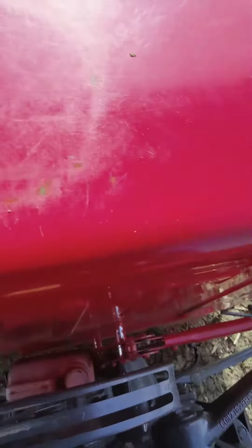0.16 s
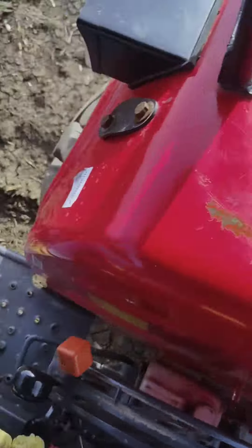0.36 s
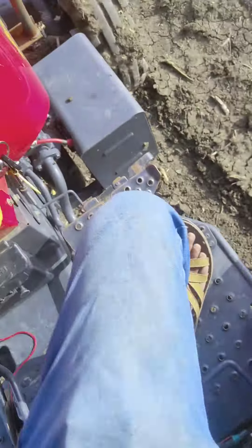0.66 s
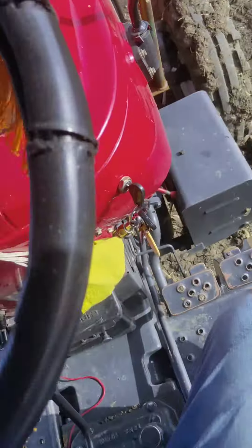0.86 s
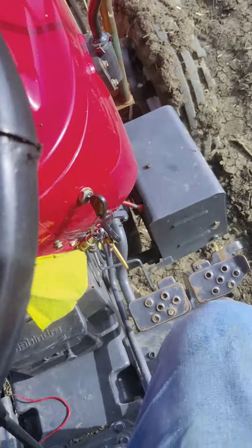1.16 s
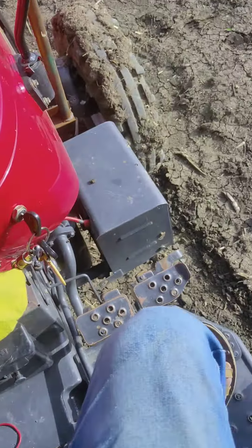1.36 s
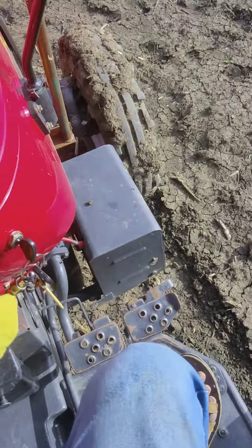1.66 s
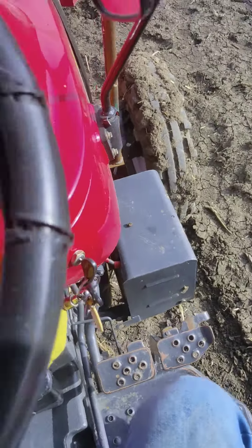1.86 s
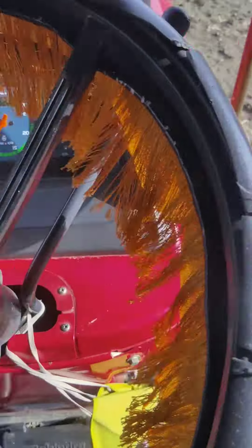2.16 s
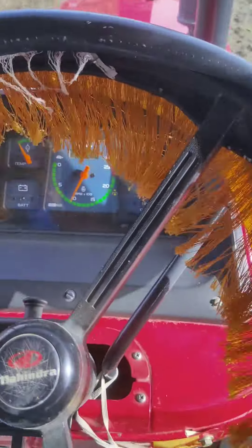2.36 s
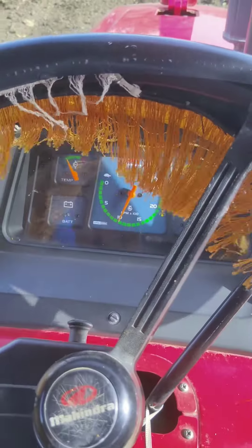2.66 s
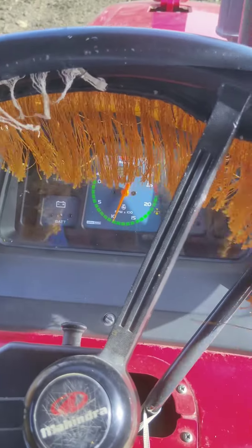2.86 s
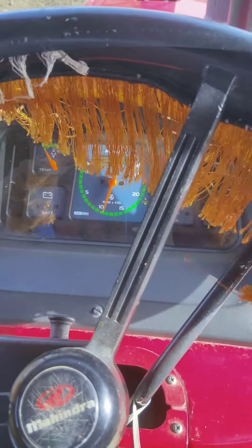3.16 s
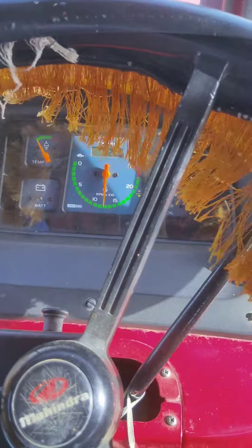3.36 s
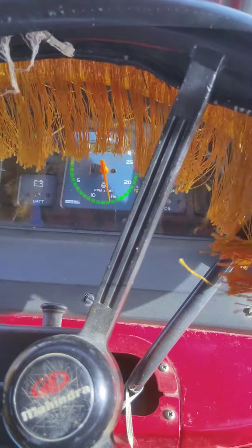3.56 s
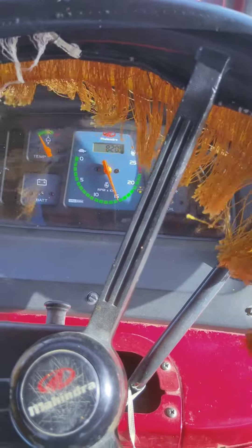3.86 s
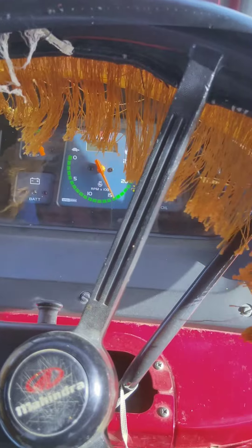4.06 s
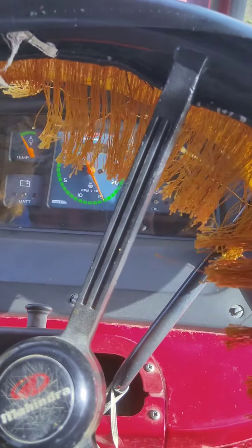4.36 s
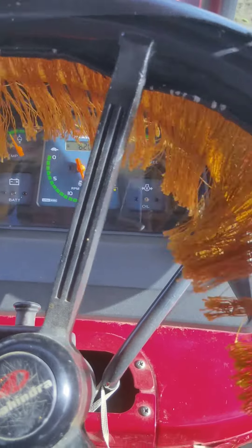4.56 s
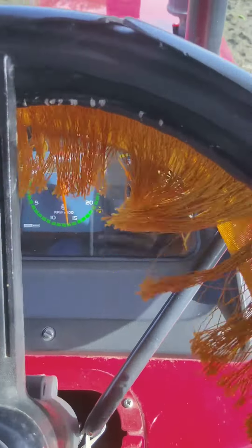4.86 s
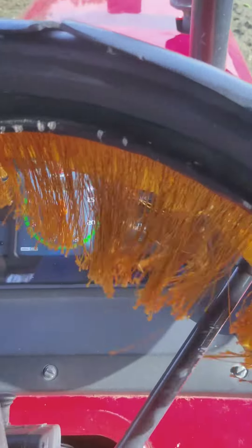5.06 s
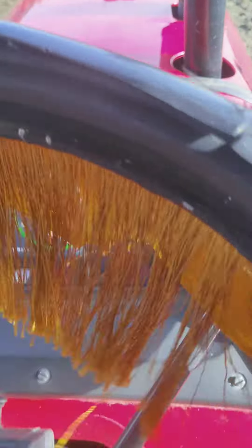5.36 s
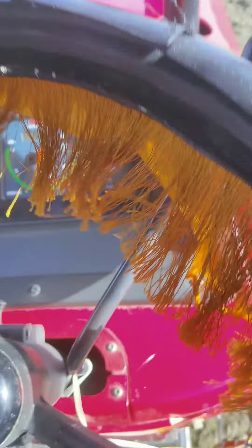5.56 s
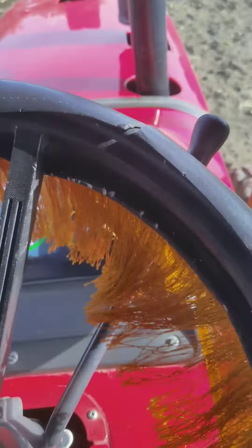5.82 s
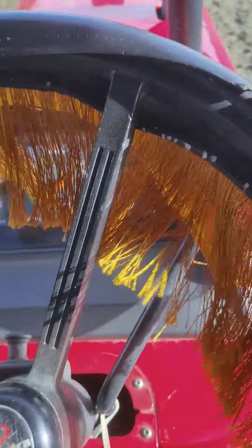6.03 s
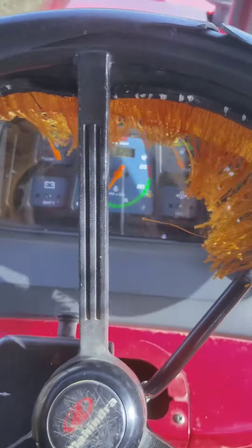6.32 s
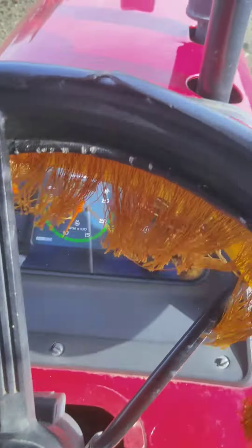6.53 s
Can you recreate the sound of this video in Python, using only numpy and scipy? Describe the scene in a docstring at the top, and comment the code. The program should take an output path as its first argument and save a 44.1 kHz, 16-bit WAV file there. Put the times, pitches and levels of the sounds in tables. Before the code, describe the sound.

A small diesel tractor idles, revs up in steps to a hard roar, coasts down, then labours loudly under load with a few metallic clicks.

```python
"""A field, heard from the driver's seat of a three-cylinder diesel tractor dragging a cultivator.
It idles, revs up, coasts down, then labours under load. Every firing gives an exhaust puff built
from low multiples of the firing rate, and bursts of coloured noise for rumble, thud, knock and clatter.
The block and cylinder walls ring as resonators, gears whine at higher engine orders, gear teeth rattle
when the throttle shuts, and there are a few sharp metallic clicks, some of them harder knocks on a firing."""
import sys
import numpy as np
from scipy import signal
from scipy.fft import rfft, irfft
from scipy.io import wavfile

SR = 44100
rng = np.random.default_rng(int(sys.argv[2]) if len(sys.argv) > 2 else 0)


def waveform_to_disk(signal):
    """Save audio, clipped to [-1, 1], as 16-bit WAV at the path in sys.argv[1]."""
    frames = np.transpose(np.atleast_2d(signal))
    scaled = np.clip(frames, -1, 1) * 32767
    samples = np.round(scaled).astype(np.int16)
    wavfile.write(sys.argv[1], SR, samples)


N = 295029

# colour of heavy blows on the block: (frequency [Hz], level per Hz [dB])
THUD_COLOUR = [(280, -11), (450, -1), (530, -1.5), (615, 0.5), (690, -3.5), (790, -5), (900, -6),
               (1000, -11), (1200, -19.5), (1500, -29), (2600, -57)]
# colour of bright metallic clatter: (frequency [Hz], level per Hz [dB])
CLATTER_COLOUR = [(2400, -24.5), (3500, -14), (4500, -8.5), (4950, -6.5), (5400, -5.5), (5900, -1),
                  (6450, 2.5), (7000, -2), (7550, -4), (8000, -26.5), (9000, -47)]


def from_db(db):
    """Decibels to gain."""
    return 10 ** (np.asarray(db) / 20)


def rms_one(x):
    """Scale to rms 1."""
    return x / np.sqrt(np.mean(x ** 2) + 1e-20)


def in_time(rows):
    """Read a (time, value) curve at every sample."""
    times, values = np.transpose(rows)
    return np.interp(np.arange(N) / SR, times, values)


def at_hz(points, hz):
    """Read a table over log frequency at the given frequencies."""
    table_hz, value = np.transpose(points)
    return np.interp(np.log(hz), np.log(table_hz), value)


def at_bins(points):
    """Read a table over log frequency at every FFT bin."""
    return at_hz(points, np.arange(N // 2 + 1) * SR / N + 1)  # 1 Hz up, to avoid log(0)


def drift(rate):
    """Smooth chance with so many turns a second; spread 1."""
    position = np.arange(N) * rate / SR
    return rms_one(np.interp(position, np.arange(N), rng.standard_normal(N)))


def radiate(pair, colour):
    """Two unrelated vibrations take a part's colour and reach both ports, most alike in the bass; rms 1."""
    # likeness of the two microphone ports: (frequency [Hz], correlation [-1 to 1])
    likeness = [(60, 1), (120, 0.73), (240, 0.91), (490, 0.6), (750, 0.16), (1100, 0.4), (2500, 0.22),
                (7000, 0.17)]
    # above the bass the engine is heard directly, later at the left port: (frequency [Hz], lag [s])
    port_lag = [(700, 0), (1050, .00043)]
    mid, side = rfft(pair) * from_db(at_bins(colour))
    alike = np.clip(at_bins(likeness), -.99, .99)
    shared = np.sqrt(1 + alike) * mid
    apart = np.sqrt(1 - alike) * side
    bin_hz = np.arange(len(mid)) * SR / N
    late = np.exp(-2j * np.pi * bin_hz * at_bins(port_lag))
    return rms_one(irfft(np.array([(shared + apart) * late, shared - apart]), N))


def shaking(firings, repeat, size=2400):
    """Dense contacts: one share recurs at the same crank angles every three firings, the rest is new."""
    contact = (firings / 3 % 1 * size).astype(int) % size
    density = np.minimum(np.gradient(firings) * size / 3, 1)  # contacts per sample: evens the power per Hz
    locked = rng.standard_normal((2, size))[:, contact] * np.sqrt(density)
    return np.sqrt(repeat) * locked + np.sqrt(1 - repeat) * rng.standard_normal((2, N))


def bursts(firings, depth, cylinder_db, scatter_db, grain_db, grain_rate):
    """Each firing swells fast and dies away; cylinders and firings differ in strength; mean power about 1."""
    # one burst: (share of the firing interval since injection [0-1], relative level at depth 1 [dB])
    burst = [(0, -13), (.07, -18), (.16, -1), (.35, 1), (.6, -10.5), (.9, -12), (1, -16)]
    number = np.floor(firings).astype(int) + 1  # the first firing is already under way
    shape = from_db(depth * np.interp(firings % 1, *np.transpose(burst)))
    power = np.bincount(number, shape ** 2) / np.bincount(number).clip(1)
    even_shape = shape / np.sqrt(power[number])
    strength_db = np.array(cylinder_db)[number % 3] + scatter_db * rng.standard_normal(N)[number]
    return even_shape * rms_one(from_db(strength_db + grain_db * drift(grain_rate)))


def line(firings, order, waver_db, wander, port_turn):
    """One engine order wavers in level and timing, slightly out of step at the ports; rms about 1."""
    turn = 2 * np.pi * order * firings + wander * drift(15)  # wander and port_turn in radians
    turn = turn + port_turn * np.array([[-1], [1]])
    return np.sqrt(2) * np.cos(turn) * from_db(waver_db * drift(16))


def resonate(x, hz, width_hz):
    """A mode that keeps ringing after it is shaken; gain about 1 at its centre."""
    r = np.exp(-np.pi * width_hz / SR)
    feed = np.array([1, 0, -1]) * (1 - r * r) / 2
    return signal.lfilter(feed, [1, -2 * r * np.cos(2 * np.pi * hz / SR), r * r], x)


def exhaust(firings, rate, fuel, phase_step):
    """Fuel shapes the puffs; the silencer leaves low multiples that boom as they cross the pipe resonance."""
    # puff before the pipe: (multiple of the firing rate, idling [dB], cruising [dB],
    # speeding up [dB], labouring [dB])
    puff = [(1, -27, -9.5, -7.5, -15.5), (2, -33, -15, -13, -8), (3, -34, -18.5, -20, -14),
            (4, -32.5, -23.5, -18, -31.5), (5, -30.5, -29.5, -29.5, -15)]
    # share of the full charge in those four states: (idling, cruising, speeding up, labouring) [0-1]
    puff_fuel = (.15, .35, .75, 1)
    # exhaust pipe and silencer: (frequency [Hz], gain [dB])
    pipe = [(20, -53), (55, -31.5), (80, -13), (100, -5), (112, 0.5), (128, -2), (145, -4.5), (165, -4.5),
            (200, -8), (280, -17)]
    out = 0
    for multiple, *puff_db in puff:
        k = round(multiple)
        db = np.interp(fuel, puff_fuel, puff_db) + at_hz(pipe, k * rate)
        tone = line(firings + phase_step / k, order=k, waver_db=1.16, wander=0.029, port_turn=0.14)
        out = out + from_db(db) * tone
    return out


def chassis_rumble(firings, load):
    """The firings shake the chassis: low noise, part of it repeating with the crank, gently pulsed."""
    # (frequency [Hz], level per Hz [dB])
    colour = [(30, -47.5), (70, -17), (100, -5.5), (125, -1.5), (165, 0), (205, -2.5), (245, -0.6),
              (288, -3.5), (370, -5.5), (430, -11), (520, -20), (900, -58.5)]
    pulse = bursts(firings, 0.11 * load, [0, .3, -.3], scatter_db=0.38, grain_db=0.77, grain_rate=48)
    return radiate(shaking(firings, repeat=0.51), colour) * pulse


def block_thud(firings, load):
    """Each firing thumps the block: low-mid noise in uneven pulses."""
    pulse = bursts(firings, .5 * load, [-.7, 1.1, -.4], scatter_db=1.5, grain_db=0.0, grain_rate=270)
    return radiate(shaking(firings, repeat=0.49), THUD_COLOUR) * pulse


def block_ring(firings, load):
    """Each firing shakes the block and bonnet, whose modes ring on between firings; rms 1."""
    # block and bonnet modes: (frequency [Hz], width [Hz], relative level [dB])
    modes = [(340, 82, 5), (551, 64, -4.5), (612.4, 23.7, 4.5), (801, 55, -7), (845.5, 25, 0),
             (1080, 180, -15)]
    blows = radiate(shaking(firings, repeat=0.29), [(150, -28.5), (300, 5.5), (1100, 3.5), (1500, -19)])
    blows *= bursts(firings, 0.24 * load, [-.7, 1.1, -.4], scatter_db=1.6, grain_db=3.2, grain_rate=360)
    ring = 0
    for k, (hz, width_hz, db) in enumerate(modes):
        ring = ring + (-1) ** k * from_db(db) * resonate(blows, hz, width_hz)  # alternating polarity
    return rms_one(ring)


def ignition(firings, fall, scale_db):
    """The fuel ignites with a crack that dies within a small share of the firing interval."""
    age = firings % 1 / fall
    return from_db(scale_db) * np.exp(-age) * (1 - np.exp(-2 * age))


def combustion_knock(firings, force):
    """Combustion pressure knocks on the metal: mid-to-high noise driven by the combustion force."""
    # (frequency [Hz], level per Hz [dB])
    colour = [(700, -17.5), (1100, 5), (1400, -5.5), (1560, -2), (1850, -10), (2150, -7), (2650, -8),
              (3300, -10.5), (4500, -15), (7000, -46.5)]
    return radiate(shaking(firings, repeat=0.44), colour) * force


def wall_ring(firings, force, hz, width_hz):
    """Combustion makes the cylinder walls ring: the metallic note of the knock; rms 1."""
    blows = shaking(firings, repeat=0.63) * force
    return rms_one(resonate(resonate(blows, hz, width_hz), hz, width_hz))


def injector_clatter(firings, load, crack):
    """Injectors and ignition clatter: bright fresh noise in deep, grainy bursts."""
    pulse = bursts(firings, 1.0 * load, [-.8, .4, .4], scatter_db=1.0, grain_db=1.27, grain_rate=550)
    return radiate(rng.standard_normal((2, N)), CLATTER_COLOUR) * rms_one(1 + 0.5 * crack) * pulse


def engine_body(firings, rate, fuel):
    """Each part follows speed and fuel; firings stand out most when the engine is slow and pulls hard."""
    # how loud each part is, before the nearness: (level at cruising speed with no fuel [dB],
    # rise per doubling of speed [dB], rise at full fuel [dB], exponent of the fuel)
    rumble_law = (-22.5, 7, 2, 3.6)
    thud_law = (-29.5, 3.5, 6, 1.64)
    block_ring_law = (-29, 2.5, 5, 1)
    knock_law = (-45, 3, 11, 0.29)
    wall_ring_law = (-52.5, 3.5, 14.5, 0.57)
    clatter_law = (-41, 6.5, 13, 1.2)
    doublings = np.log2(rate / 36)  # cruising is 36 firings per s
    # sharpness of single firings, 0-1: at cruise, added by full fuel, lost per doubling of speed
    load = np.clip(0.31 + 0.26 * fuel - 0.55 * doublings, 0, 1)

    def level(law):
        """A part's gain at the present speed and fuel."""
        cruise_db, speed_db, fuel_db, exponent = law
        return from_db(cruise_db + speed_db * doublings + fuel_db * fuel ** exponent)

    crack = load * ignition(firings, fall=0.16, scale_db=5.5)
    force = rms_one(1 + crack)
    force = force * bursts(firings, 0.8 * load, [-.5, .4, .1], scatter_db=1.0, grain_db=0.6, grain_rate=510)
    out = chassis_rumble(firings, load) * level(rumble_law)
    out += block_thud(firings, load) * level(thud_law)
    out += block_ring(firings, load) * level(block_ring_law)
    out += combustion_knock(firings, force) * level(knock_law)
    out += wall_ring(firings, force, hz=1800, width_hz=470) * level(wall_ring_law)
    out += injector_clatter(firings, load, crack) * level(clatter_law)
    return out


def drive_train(firings):
    """Gears and panels make higher engine orders sing out for a while, gliding with the speed."""
    # (time of the peak [s], half length [s], multiple of the firing rate, level at the peak [dB])
    whine = [(2.6, 0.3, 7, -33.5), (2.716, 0.45, 9, -40), (3.597, .52, 6, -25), (3.874, .2, 7, -22.5),
             (5.28, 0.077, 9, -22.5), (5.474, 0.083, 20, -27), (5.501, 0.11, 7, -24.5),
             (5.98, .48, 6, -25.5), (6.002, 0.12, 14, -23), (6.47, 0.18, 14, -27.5), (6.5, 0.36, 11, -29.5),
             (6.58, 0.22, 10, -28)]
    t, out = np.arange(N) / SR, 0
    for peak_s, half_s, order, db in whine:
        tone = line(firings + rng.random(), order=round(order), waver_db=1.2, wander=.3, port_turn=.25)
        swell = np.exp(-((t - peak_s) / half_s) ** 2 / 2)
        out = out + from_db(db) * swell * tone
    return out


def sharp_clicks(decay_s):
    """Sharp metallic clicks, some of them harder knocks on a firing: bright noise fading exponentially."""
    # (time [s], level at the onset [dB])
    clicks = [(3.808, -33), (4.883, -19), (5.705, -18), (6.023, -26)]
    onsets = np.zeros(N)
    for s, db in clicks:
        onsets[int(s * SR)] = from_db(db)
    fade = signal.lfilter([1], [1, -np.exp(-1 / (decay_s * SR))], onsets + 1e-18)
    return fade * radiate(rng.standard_normal((2, N)), CLATTER_COLOUR)


def backlash(firings, attack_s, decay_s, thud_db, clatter_db):
    """When the throttle shuts, the gear teeth go slack and rattle for a moment."""
    throttle_shuts_s = 4.05
    age = np.maximum(np.arange(N) / SR - throttle_shuts_s, 0)
    teeth = shaking(firings, repeat=.3)
    rattle = from_db(thud_db) * radiate(teeth, THUD_COLOUR)
    rattle += from_db(clatter_db) * radiate(teeth, CLATTER_COLOUR)
    return rattle * (1 - np.exp(-age / attack_s)) * np.exp(-age / decay_s)


def scene():
    """Engine and gears turn with the crankshaft, the engine follows the fuel, and sharp clicks are added."""
    # engine speed: (time [s], firing rate [firings per s])
    firing = [(0.0, 19.99), (0.92, 20.18), (1.12, 26.51), (1.24, 26.54), (1.91, 31.05), (2.25, 34.91),
              (3.07, 36.39), (3.4, 56.08), (4.17, 53.58), (4.22, 51.18), (4.67, 41.72), (4.84, 32.95),
              (4.97, 41.34), (5.22, 38.33), (5.44, 26.96), (5.54, 25.48), (5.83, 29.9), (6.2, 31.66),
              (6.39, 35.24), (6.69, 39.07)]
    # fuel per stroke, a blip, a light cruise, a rev-up, a coast, then hard pulling:
    # (time [s], share of the full charge [0-1])
    fuel_curve = [(0, 0.11), (.87, 0.19), (1.08, 0.68), (1.22, 0.22), (1.42, 0.38), (3.02, .36),
                  (3.16, 0.87), (3.34, 0.79), (3.43, 0.3), (4.04, 0.44), (4.08, 0.15), (4.2, 0.35),
                  (4.45, 0.1), (4.82, 0.02), (4.87, 0.87), (5.2, 0.73), (5.33, 0.92), (6.1, 0.95),
                  (6.69, 0.77)]
    # the engine block as the hand-held microphone moves about the seat: (time [s], level [dB])
    nearness = [(0, -1.5), (2.0, -0.05), (2.5, -1.5), (3.6, 1.34), (4.15, 1.84), (4.9, 1.0), (6.0, 0),
                (6.69, 0.5)]
    rate, fuel = in_time(firing), in_time(fuel_curve)
    firings = np.cumsum(rate) / SR - .77  # the first burst starts at this share of a firing interval
    engine = exhaust(firings, rate, fuel, phase_step=-0.049)
    engine = engine + from_db(in_time(nearness)) * engine_body(firings, rate, fuel)
    gears = drive_train(firings)
    gears = gears + backlash(firings, attack_s=0.018, decay_s=0.36, thud_db=-26.5, clatter_db=-30.5)
    return engine + gears + sharp_clicks(decay_s=0.01)


def record(dry):
    """The treble above 7900 Hz is cut steeply by an elliptic low-pass."""
    low_pass = signal.ellip(10, .2, 90, 7900, fs=SR, output="sos")  # ripple .2 dB, stop band -90 dB
    return signal.sosfilt(low_pass, dry)


dry = scene()
out = record(dry)
waveform_to_disk(out)
```